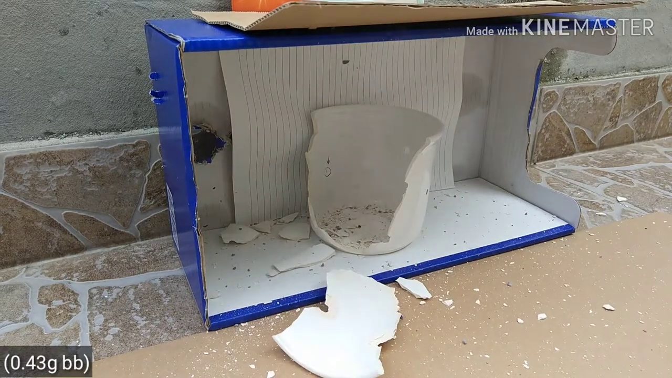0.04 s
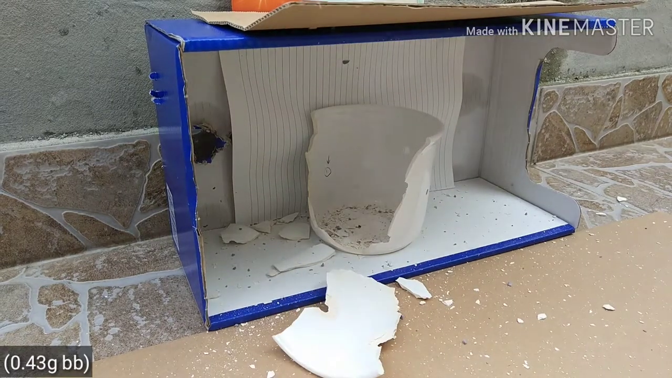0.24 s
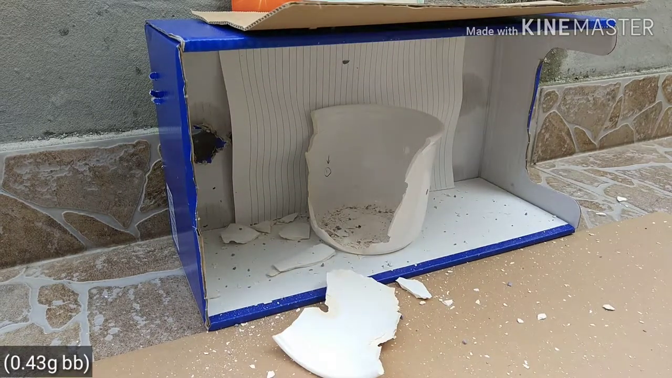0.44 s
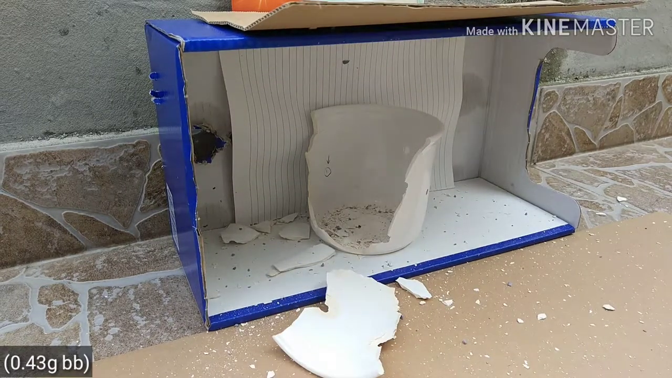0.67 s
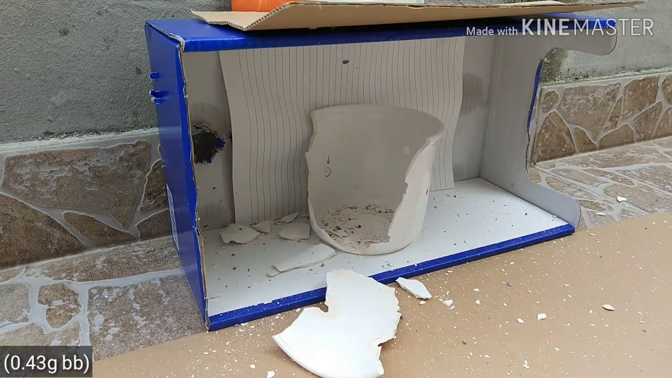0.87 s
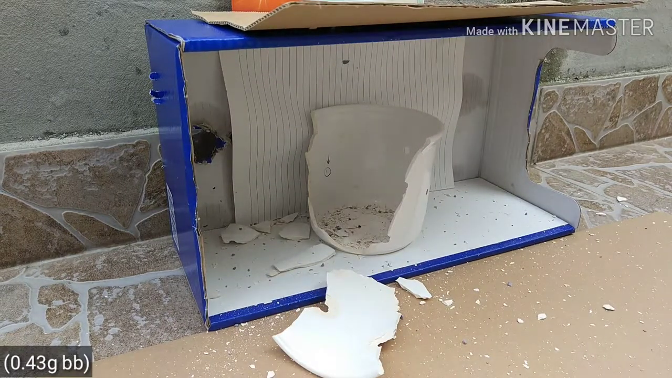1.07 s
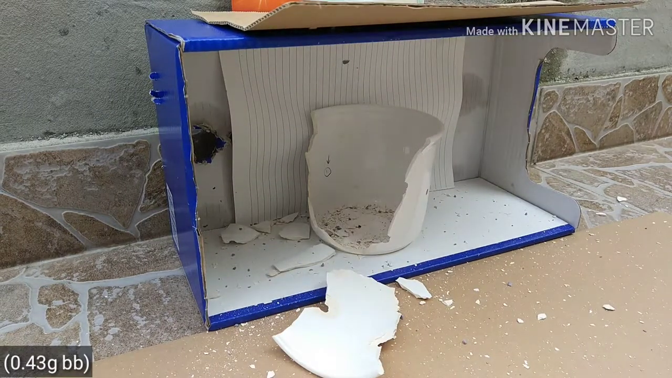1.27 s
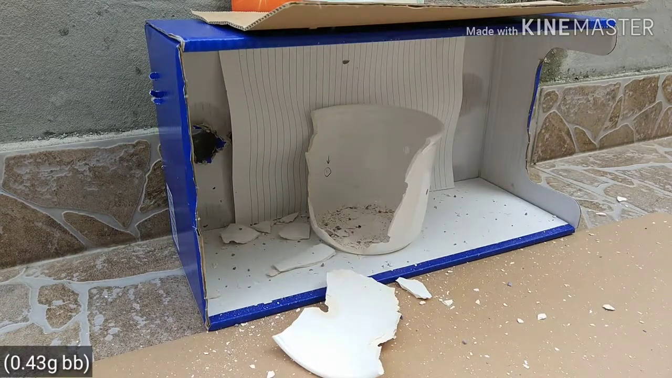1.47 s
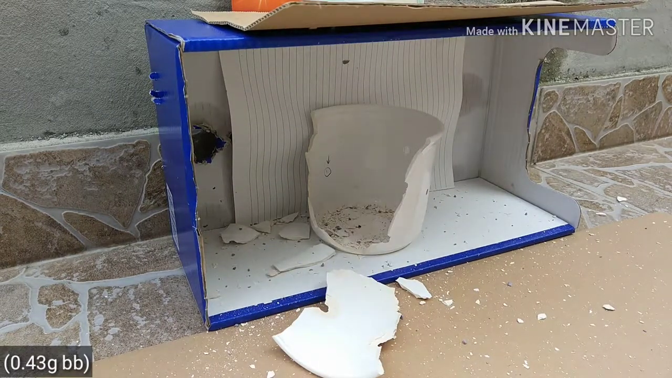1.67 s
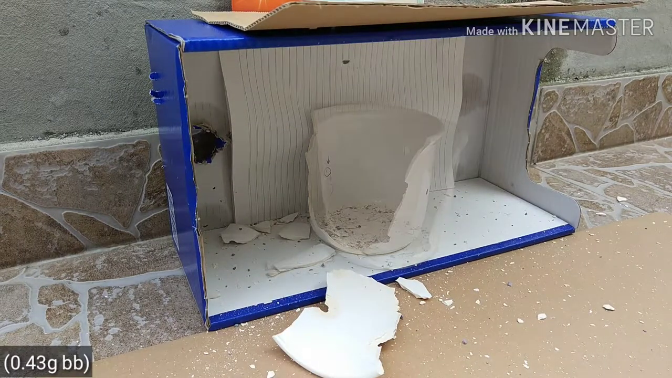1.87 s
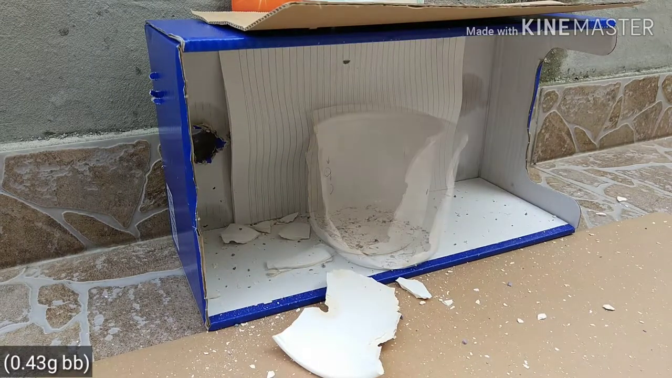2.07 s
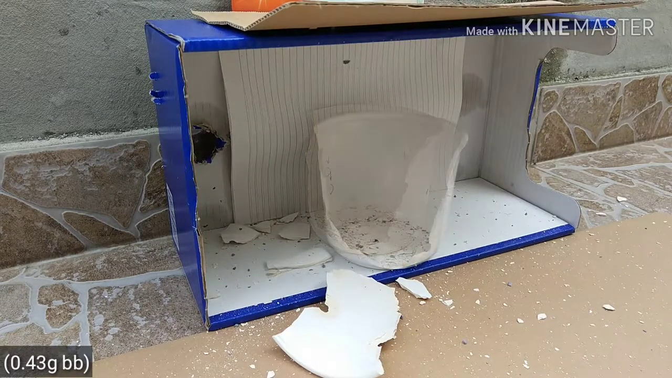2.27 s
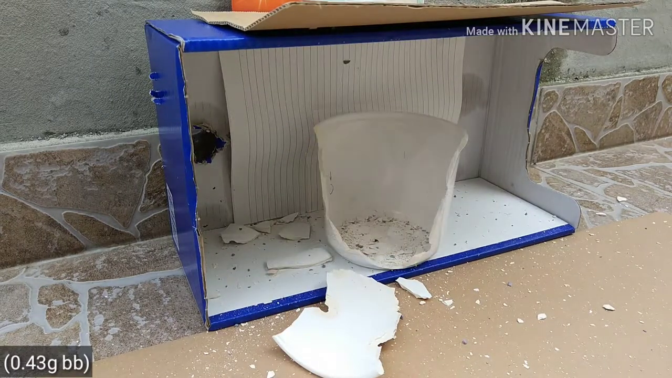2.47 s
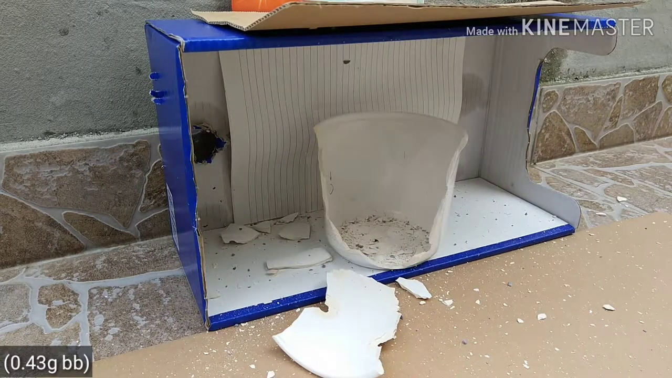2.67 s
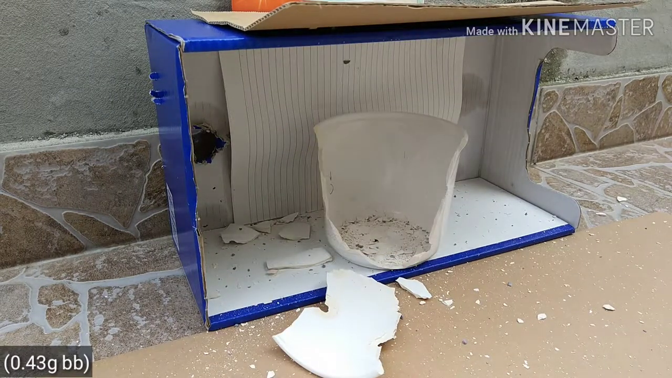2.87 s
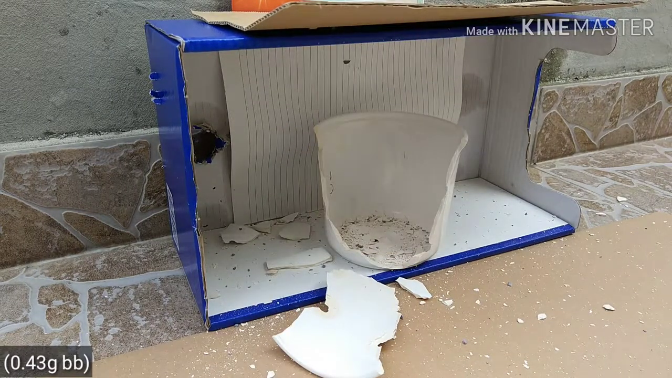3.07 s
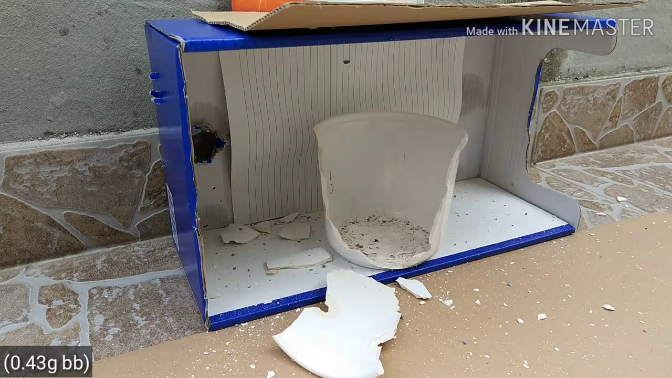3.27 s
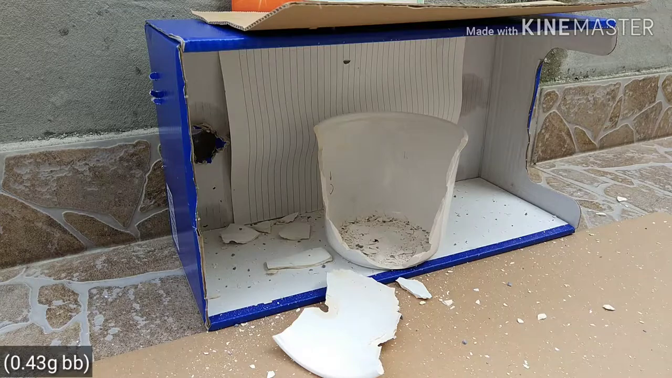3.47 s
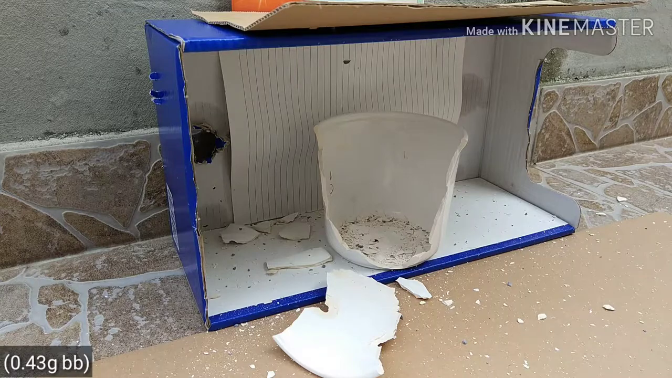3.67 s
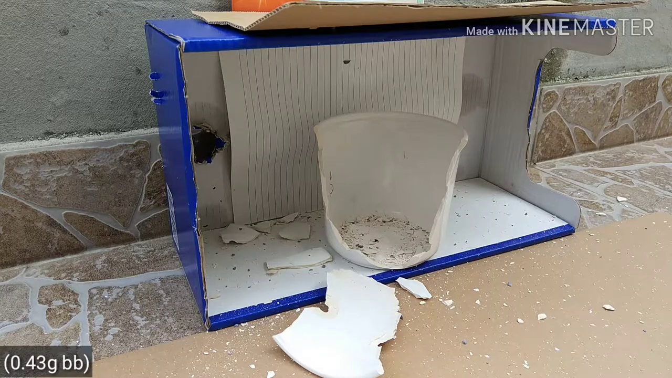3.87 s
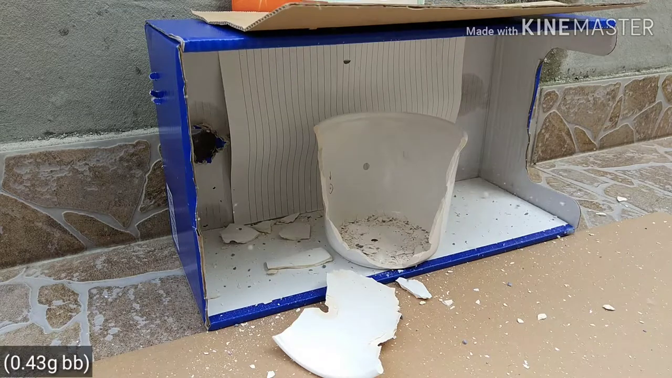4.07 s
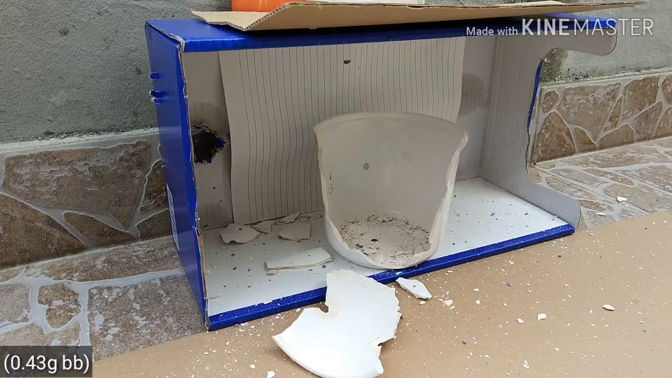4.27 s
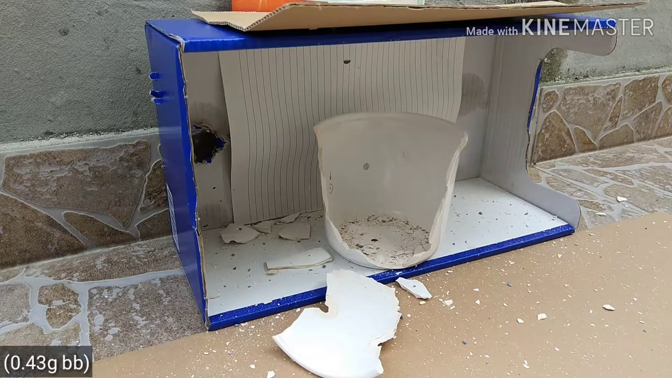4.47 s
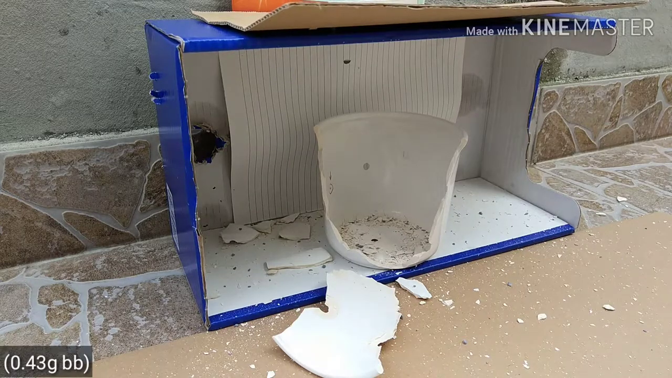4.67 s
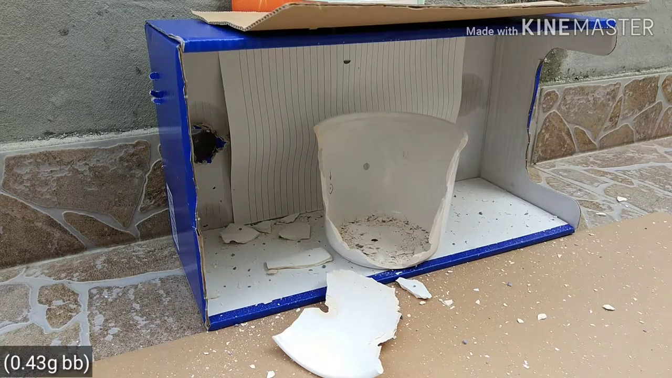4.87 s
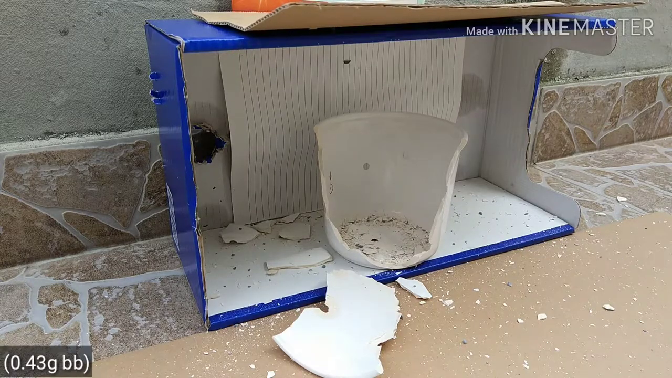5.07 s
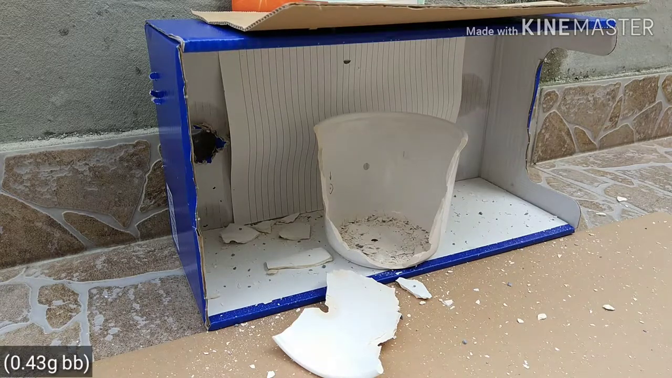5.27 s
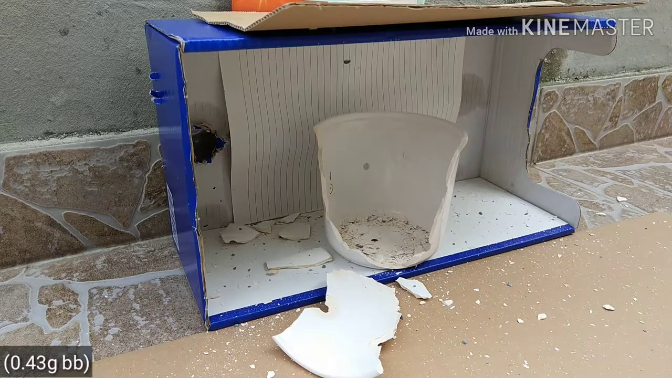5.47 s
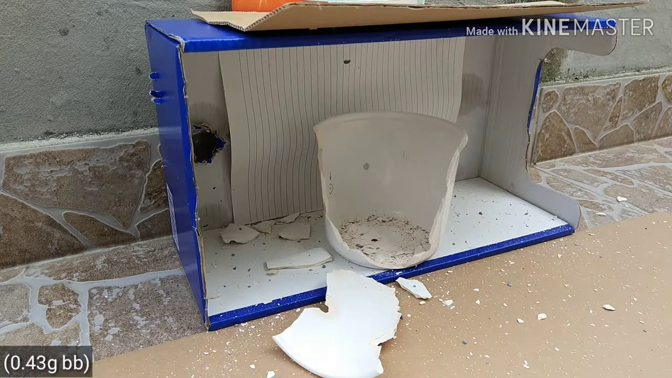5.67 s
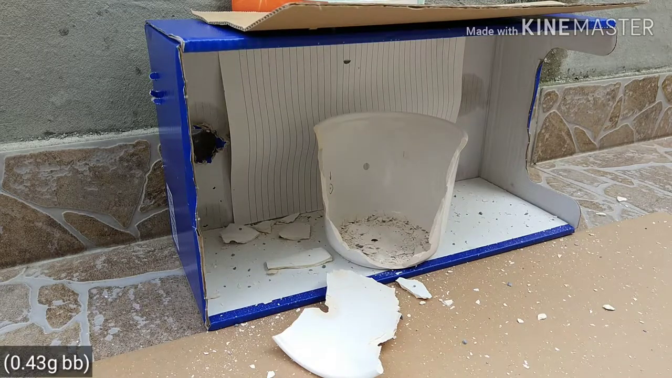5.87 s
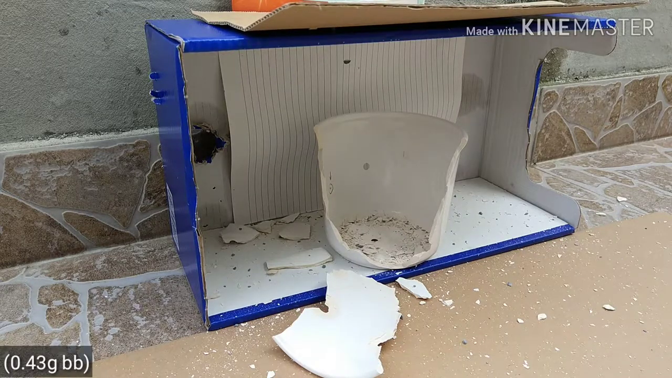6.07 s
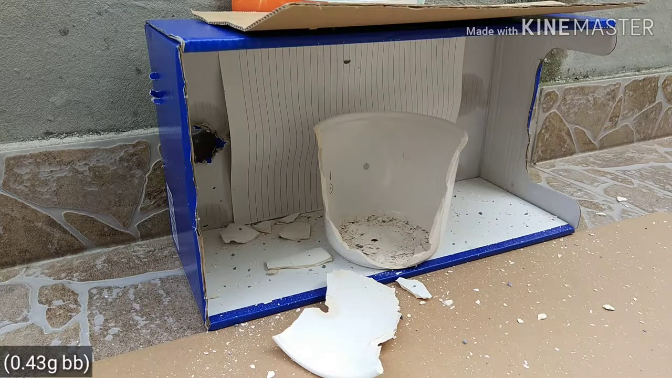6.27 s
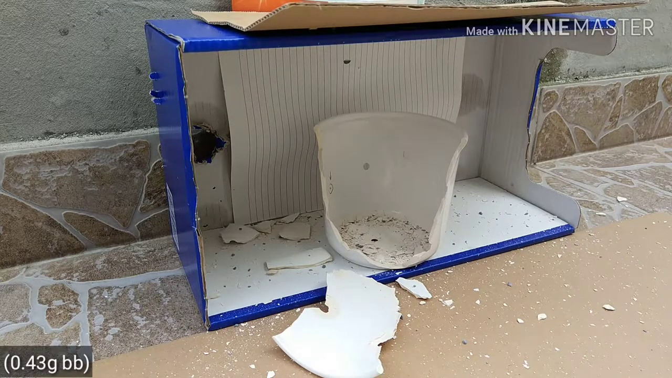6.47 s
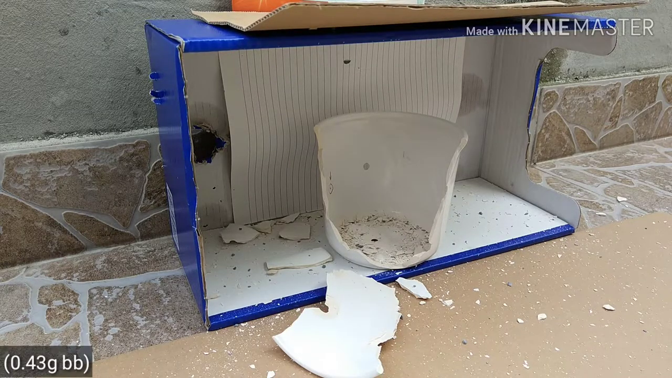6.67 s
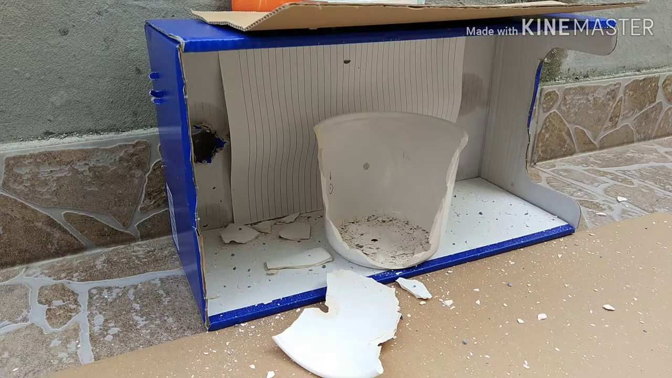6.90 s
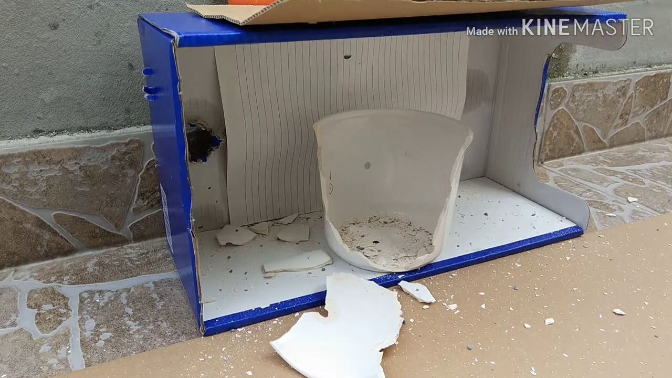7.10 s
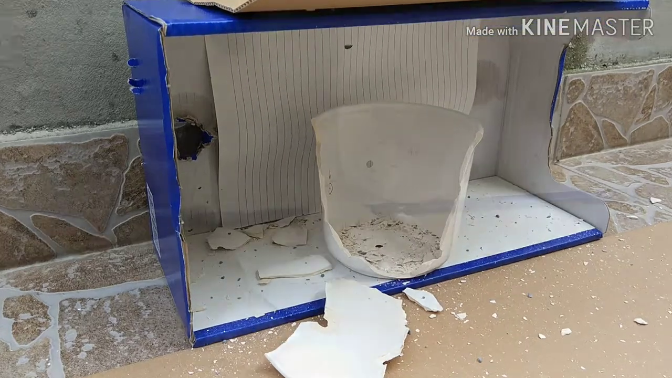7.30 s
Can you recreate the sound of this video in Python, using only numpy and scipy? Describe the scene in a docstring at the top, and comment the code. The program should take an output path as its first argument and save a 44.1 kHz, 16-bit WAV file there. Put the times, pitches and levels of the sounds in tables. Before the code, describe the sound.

A pellet cracks violently into a broken ceramic pot, showering grit and shards, amid sparse sharp chip ticks and faint traffic hum outdoors.

```python
"""Close to a two-microphone camera on a tiled yard: traffic hum, hiss and a thin far tone; chips tick near the left.
A vehicle's drone, summed from wavering engine orders, swells from about 2 s, as more chips tick and grit spills.
At 3.94 s a plastic pellet cracks a broken ceramic pot in an open box: noise bursts, dull resonances and echoes.
Noise and tiny damped tones make the shower of grit and shards that follows, while the left side dips briefly.
Stray ticks, clinks and small spills come after; the drone sinks in pitch around 5.35 s and fades."""
import sys
import numpy as np
from scipy import signal
from scipy.fft import rfft, irfft, next_fast_len
from scipy.io import wavfile
from scipy.ndimage import uniform_filter1d, map_coordinates

SR = 44100
rng = np.random.default_rng(int(sys.argv[2]) if len(sys.argv) > 2 else 0)


def master_out(mix):
    """Clip the mix to full scale and print it as 16-bit PCM to the path in sys.argv[1]."""
    frames = np.transpose(np.atleast_2d(mix))
    ceiling = np.clip(frames, -1, 1)
    pcm = np.round(ceiling * 32767).astype(np.int16)
    wavfile.write(sys.argv[1], SR, pcm)


def gain_from_decibels(decibels):
    """Convert decibel values to linear amplitude factors."""
    exponent = np.asarray(decibels, float) / 20
    return 10 ** exponent


N = 323694
TIME = np.arange(N) / SR  # seconds

# town bed before its wobble: start_s, traffic_level_db, far_hiss_level_db
TOWN_LEVELS = [(0, -64.5, -58.5), (.8, -62.5, -61.5), (2.0, -64, -63.5), (2.3, -64, -67),
               (2.76, -60, -66.5), (3.2, -56.5, -63), (4.6, -57.5, -64), (5.8, -60.5, -63),
               (6.8, -60.5, -64), (7.34, -64.5, -67.5)]
# colour of the traffic rumble, before scaling to rms 1: frequency_hz, density_db
TRAFFIC_SPECTRUM = [(30, -46.5), (60, -36), (100, -20.5), (150, -11.5), (185, -14), (205, -3), (235, -9.5),
                    (270, -7.5), (300, -4.5), (340, -12), (620, -15), (1000, -18.5), (3000, -32.5),
                    (6000, -59.5)]
# how alike the rumble is at the two microphones: frequency_hz, correlation (-1 to 1)
RUMBLE_LIKENESS = [(60, 0.94), (150, 0.79), (380, 0.78), (950, -0.21), (2380, -0.64), (5980, 0.16),
                   (15000, -0.42)]
# colour of the far hiss, before scaling to rms 1: frequency_hz, density_db
HISS_SPECTRUM = [(400, -16), (700, -9), (1500, -14.5), (4000, -19.5), (8000, -19.5), (12000, -12),
                 (15000, -20)]
# passing engine, common to all its orders: start_s, level_db
ENGINE_LEVEL = [(1.8, -94), (2.3, -73), (2.8, -69.5), (3.8, -64), (4.4, -70), (5.4, -69), (6.2, -72),
                (7.34, -81.5)]
# engine orders relative to that level: multiple_of_base_pitch, level_db
ENGINE_ORDERS = [(1, -2), (2, -4.5), (3, 4.5), (4, 0.5)]
# thin tone far off, before its wobble: start_s, level_db
WHINE_LEVEL = [(0, -75.5), (3.8, -80.5), (5, -74.5), (7, -68.5), (7.34, -87)]
# slow level of the fine rustle near the left microphone: start_s, level_db
RUSTLE_LEVEL = [(0, -59.5), (.88, -61.5), (1.06, -55), (1.4, -62), (2.02, -71), (2.5, -90), (4.4, -90),
                (4.6, -57.5), (5.0, -71.5), (5.9, -65), (6.1, -71), (7.34, -73)]
# shower after the shot: start_s, grit_level_db, shards_level_db (shards before the left-right balance)
SHOWER_LEVELS = [(3.95, -90.5, -90), (3.96, -28.5, -38), (4.0, -30, -38), (4.06, -31, -30),
                 (4.12, -28.5, -39), (4.2, -28.5, -43), (4.3, -28.5, -50), (4.4, -34, -53),
                 (4.48, -36.5, -59), (4.58, -56.5, -62.5), (4.7, -72, -74), (5.0, -91, -68.5)]
# short spills: start_s, length_s, grit_level_db, shards_level_db (shards before the left-right balance)
SPILLS_OF_DEBRIS = [(2.108, 0.099, -59.5, -73), (2.222, 0.027, -55, -92), (3.962, .015, -17.5, -28),
                    (4.739, 0.21, -52.5, -65.5), (5.338, .03, -56.5, -90), (5.648, 0.016, -57, -90),
                    (6.45, 0.029, -62, -91.5), (6.85, .02, -60.5, -90)]
# colour of fine grit, before scaling to rms 1: frequency_hz, density_db
GRIT_SPECTRUM = [(500, -39.5), (1500, -22.5), (3000, -11.5), (7500, -15), (10000, -7.5), (12000, 3),
                 (14000, -4.5), (15600, -6)]
# colour of the shards' wash, before scaling to rms 1: frequency_hz, density_db
SHARD_SPECTRUM = [(100, -27.5), (250, 0), (700, -5.5), (2200, -3.5), (4500, -7), (9000, -6.5),
                  (15000, -10.5), (16500, -16)]
# colour of near sounds on reaching the far microphone: frequency_hz, gain_db
FAR_SIDE_GAIN = [(1000, 0.5), (5000, 5), (8000, 3.5), (12000, -6.5), (15000, -5.5)]
# lower clinks of bigger pieces: start_s, pitch_hz, level_db, t60_s
PIECE_CLINKS = [(0.0923, 2920, -41.5, 0.07), (0.095, 2100, -48, 0.084), (0.1635, 820, -52, 0.048),
                (1.1197, 1450, -53, 0.084), (1.1195, 3930, -53, 0.061), (1.121, 5200, -46, 0.075),
                (1.236, 2110, -51, 0.11), (2.217, 6400, -61, .03), (2.249, 3700, -59, .05),
                (4.037, 342, -31, .027), (4.076, 1270, -32, 0.022), (4.16, 4400, -31.5, 0.056),
                (4.1746, 393, -42, .022), (4.2094, 333, -32, 0.021), (4.2356, 1997, -24.5, 0.037),
                (4.2367, 2424, -23, .025), (4.2694, 3980, -37, .022), (4.296, 5350, -35.5, 0.034),
                (4.335, 4030, -40, 0.02), (4.3806, 4900, -43, 0.032), (4.4988, 2890, -32.5, 0.032),
                (4.499, 3400, -35, 0.035), (4.4992, 5570, -25, 0.012), (5.1142, 5490, -41, 0.068),
                (5.1142, 2800, -47.5, 0.039), (5.9765, 3240, -40, 0.027), (5.9776, 5500, -49, 0.052)]
# bright ticks of chips: start_s, left_level_db, right_level_db, skid_t60_s, brightness_db_per_octave
CHIP_TICKS = [(0.0936, -11, -23, 0.024, -6.5), (0.1627, -42, -59, .023, -2), (0.912, -46, -58, .015, 0),
              (1.1187, -15, -55, 0.024, -2), (1.121, -21, -54, 0.015, -3), (1.237, -17.5, -50, 0.035, -4),
              (2.217, -36.5, -64, .017, -1), (2.2495, -32.5, -52, 0.032, -7), (4.076, -25.5, -42, 0.016, 3),
              (4.16, -32, -43, .019, 0), (4.1744, -19, -41, 0.014, 0), (4.212, -20.5, -40, 0.015, 4),
              (4.237, -24.5, -42, 0.014, 0), (4.2571, -22, -42, .015, 0), (4.2703, -14, -42, .012, 3),
              (4.2965, -16.5, -44, 0.026, -2.5), (4.3354, -20, -49, .013, 5), (4.3802, -21, -56, 0.033, 3),
              (4.4123, -24, -56, 0.019, 3), (4.4619, -27, -55, .013, 0), (4.49, -28, -44, 0.0097, 0),
              (4.4993, -10.5, -40, 0.012, 0), (4.555, -41, -68, 0.02, 2), (4.595, -39.5, -58, 0.012, 2),
              (4.647, -36, -61, 0.01, 4), (5.1135, -10.5, -39, .016, 9), (5.133, -25, -44, 0.013, 2.5),
              (5.3386, -39, -54.5, 0.015, 3), (5.9773, -8.5, -39, 0.012, 14), (6.011, -31, -43.5, .014, 3),
              (6.055, -45, -65, 0.016, 3)]
# modes of a small chip, before each tick's tilt and random strengths: pitch_hz, width_hz, level_db
CHIP_MODES = [(6090, 290, -9.5), (6190, 370, -6.5), (8720, 350, -2), (8710, 290, -6), (10740, 700, 2.5),
              (11050, 140, -3), (12090, 340, 7), (12600, 550, -16), (13850, 450, -8.5), (14810, 720, -7.5)]
# pellet cracks, splitting wall and rebounds: start_s, left_level_db, right_level_db, thud_level_db, crack_t60_s
# (thud level before the left-right balance)
PELLET_CRACKS = [(3.9398, -35.5, -31.5, -53.5, 0.023), (3.9412, -4.5, -7, -34, 0.075),
                 (3.9489, -3, -7, -15.5, 0.042), (3.951, -3.5, 0.5, -5.5, 0.029),
                 (3.956, -8, -13, -6.5, 0.018), (3.9589, -2.5, -8, -8.5, 0.033),
                 (3.9638, -5, -12, -14.5, .012), (3.97, -16, -12, -22, 0.026),
                 (3.975, -9, -12.5, -24.5, .02), (3.982, -19.5, -16.5, -24, 0.035)]
# relative modes of pot and box, before the bass cut: pitch_hz, width_hz, level_db
POT_MODES = [(80, 36, -9), (222, 77, 4.5), (598.7, 110, -0.5), (945, 130, -1.5), (1180, 180, -4.5),
             (1480, 180, -2.5)]
# dying time of the yard's echoes: frequency_hz, t60_s
YARD_T60 = [(200, 0.21), (1500, 0.084), (6000, 0.13), (14000, 0.093)]
# dips of the left side after the crack, summed where they overlap, then smoothed: start_s, end_s, level_db
LEFT_DIPS = [(3.9519, 3.9573, -14), (3.971, 3.9763, -5.5), (3.98, 3.995, -13), (3.991, 4.02, -30.5),
             (4.042, 4.075, -32.5), (4.06, 4.13, -5)]
# colour of the right microphone against the left: frequency_hz, gain_db
RIGHT_MICROPHONE = [(100, 1), (1500, 1), (5000, 3), (8000, -0.5), (12000, -5.5), (15000, -1.5)]
# the camera's pass band: frequency_hz, gain_db
PASS_BAND = [(30, -14), (70, -11), (130, -5), (200, 0.5), (250, 0), (15300, -1.5), (15900, -27.5),
             (16300, -63)]


def unit(x):
    """Scales a sound to rms 1."""
    return x / np.sqrt(np.mean(x ** 2) + 1e-20)


def along(points, hz):
    """Reads (frequency_hz, value) points at hz on a logarithmic frequency axis."""
    point_hz, values = np.transpose(points)
    return np.interp(np.log(hz + 1), np.log(point_hz + 1), values)


def curves(rows):
    """Gives one value per sample for each column after the time."""
    seconds, *columns = np.transpose(rows)
    return [np.interp(TIME, seconds, column) for column in columns]


def wobble(rate):
    """Draws a smooth random curve with rate knots a second."""
    knots = rng.standard_normal(int(N * rate / SR) + 4)
    return map_coordinates(knots, [TIME * rate])


def filtered(x, response):
    """Multiplies the spectrum of x by a complex response of frequency."""
    n = x.shape[-1]
    padded = next_fast_len(n + 8192)  # silent room for the filter to ring out
    spectrum = rfft(x, padded) * response(np.fft.rfftfreq(padded, 1 / SR))
    return irfft(spectrum, padded)[..., :n]


def coloured(x, spectrum):
    """Shapes noise to the given spectrum, at rms 1."""
    return unit(filtered(x, lambda hz: gain_from_decibels(along(spectrum, hz))))


def resonances(modes):
    """Sums damped resonators (pitch_hz, width_hz, level_db) of alternating sign into a causal response."""
    def response(f):
        total = 0
        for k, (hz, width, db) in enumerate(modes):
            damping = 1j * f * width
            total = total + (-1) ** k * gain_from_decibels(db) * damping / (hz * hz - f * f + damping)
        return total
    return response


def burst(response, envelope):
    """Makes two short coloured noises, each holding exactly the energy of its envelope."""
    x = filtered(rng.standard_normal((2, len(envelope))), response) * envelope
    return x * np.linalg.norm(envelope) / np.linalg.norm(x, axis=1, keepdims=True)


def add(out, start_s, x):
    """Mixes x into out at start_s."""
    part = out[:, round(start_s * SR):][:, :x.shape[1]]
    part += x[:, :part.shape[1]]


def yard(x, wet_db):
    """Box, wall and tiles answer with noise tails, separate per side; each frequency dies at its own speed."""
    hz, t, z = signal.stft(rng.standard_normal((2, SR // 2)), SR, nperseg=128)
    decay = gain_from_decibels(-60 * t / along(YARD_T60, hz)[:, None])
    tail = signal.istft(z * decay, SR, nperseg=128)[1]
    tail = np.pad(tail / np.linalg.norm(tail[0]), ((0, 0), (60, 0)))  # echoes wait 60 samples
    return gain_from_decibels(wet_db) * signal.fftconvolve(x, tail, axes=1)[:, :x.shape[1]]


def traffic():
    """Distant rumble: mid and side noise are weighted so that left-right likeness varies with frequency."""
    def mid_side(hz):
        turn = np.arccos(np.clip(along(RUMBLE_LIKENESS, hz), -1, 1)) / 2
        return gain_from_decibels(along(TRAFFIC_SPECTRUM, hz)) * [np.cos(turn), np.sin(turn)]
    level_db = curves(TOWN_LEVELS)[0] + 0.58 * wobble(13)
    mid, side = filtered(rng.standard_normal((2, N)), mid_side)
    return gain_from_decibels(level_db) * unit(np.array([mid + side, mid - side]))


def far_hiss():
    """Far hiss: coloured noise unrelated at the two microphones."""
    return gain_from_decibels(curves(TOWN_LEVELS)[1]) * coloured(rng.standard_normal((2, N)), HISS_SPECTRUM)


def passing_engine():
    """A far vehicle drones in unsteady multiples of one base pitch, which sinks as it goes by."""
    cruise_hz, sink_hz, pass_s, pass_width_s = 65.7, 10.5, 5.35, 0.45
    base_hz = cruise_hz - sink_hz * (1 + np.tanh((TIME - pass_s) / pass_width_s)) / 2
    turns = np.cumsum(base_hz * (1 + 0.017 * wobble(7.7))) / SR
    engine_db = curves(ENGINE_LEVEL)[0]
    drone = np.zeros(N)
    for multiple, order_db in ENGINE_ORDERS:
        level_db = engine_db + order_db + 4.1 * wobble(18)
        drone += gain_from_decibels(level_db) * np.sin(2 * np.pi * multiple * turns)
    return drone


def far_whine():
    """A thin tone far off wavers slightly in level and phase."""
    level_db = curves(WHINE_LEVEL)[0] + 3 * wobble(25)
    return gain_from_decibels(level_db) * np.sin(2 * np.pi * 614 * TIME + 0.8 * wobble(5.1))


def grains(spectrum, rate, spread_db, smooth):
    """Grit: noise pulsed by uneven random clicks, rate a second, over a share of smooth noise; rms 1."""
    sizes = gain_from_decibels(spread_db * np.minimum(rng.exponential(size=N), 3))
    clicks = (rng.random(N) < rate / SR) * sizes
    spikes = np.convolve(clicks, np.exp(-TIME[:200] / 0.0012))[:N]  # each fades with a 1.2 ms constant
    return coloured(rng.standard_normal(N) * (smooth + unit(spikes)), spectrum)


def tinkle(count, centre_hz, spread, turns, spread_db):
    """Scatters tiny ceramic knocks, each a damped tone of its own pitch and place; rms 1."""
    when, pitch, size, side = rng.random((count, 4)).T
    hz = np.clip(centre_hz * np.exp(spread * (2 * pitch - 1)), 200, 15000)[:, None]
    t = TIME[:400]
    strength = gain_from_decibels(-spread_db * np.log(size + 0.044))[:, None]
    rings = strength * np.sin(2 * np.pi * hz * t) * np.exp(-hz * t / turns)
    index = (when * (N - len(t))).astype(int)[:, None] + np.arange(len(t))
    pans = [np.sqrt(side), np.sqrt(1 - side)]
    return unit(np.array([np.bincount(index.ravel(), (rings * pan[:, None]).ravel(), N) for pan in pans]))


def flow():
    """Gains of grit and of shards: slow rustle, shower and spills summed."""
    rise_db_per_s, fall_db_per_s = 1499.5, 300.5
    grit, shards = gain_from_decibels(curves(SHOWER_LEVELS))
    grit = grit + gain_from_decibels(curves(RUSTLE_LEVEL)[0])
    for start_s, length_s, grit_db, shards_db in SPILLS_OF_DEBRIS:
        before = np.maximum(start_s - TIME, 0)
        after = np.maximum(TIME - start_s - length_s, 0)
        shape = gain_from_decibels(-rise_db_per_s * before - fall_db_per_s * after)
        grit = grit + gain_from_decibels(grit_db) * shape
        shards = shards + gain_from_decibels(shards_db) * shape
    return grit, shards


def debris():
    """Fine grit pours close to the left microphone, while coarser shards wash and knock in the box."""
    grit_gain, shards_gain = flow()
    near_grit = grains(GRIT_SPECTRUM, rate=600, spread_db=-2.5, smooth=1.1)
    far_grit = grains(GRIT_SPECTRUM, rate=700, spread_db=2.5, smooth=2.5)
    far_grit = filtered(far_grit, lambda hz: gain_from_decibels(along(FAR_SIDE_GAIN, hz) - 16.5))
    grit = grit_gain * gain_from_decibels(1.2 * wobble(27)) * np.array([near_grit, far_grit])
    wash = coloured(rng.standard_normal((2, N)), SHARD_SPECTRUM)
    wash = wash * gain_from_decibels(1.8 * wobble(30) + 1.4 * wobble(90) - 2)
    knocks = tinkle(count=2500, centre_hz=2980, spread=1.1, turns=1.2, spread_db=5.5) * gain_from_decibels(-7.5)
    return grit + shards_gain * gain_from_decibels([[-9], [0.1]]) * (wash + knocks)  # left, right balance


def clinks():
    """Bigger pieces ring with the same three modes, scaled to each piece's pitch."""
    t, out = TIME[:SR // 4], np.zeros((2, N))
    for start_s, hz, db, t60 in PIECE_CLINKS:
        body = resonances([(0.37 * hz, 0.07 * hz, -16), (hz, 0.067 * hz, 0), (2.6 * hz, 0.063 * hz, -9)])
        strike = gain_from_decibels(db) * burst(body, gain_from_decibels(-60 * t / t60) * (1 - np.exp(-t / 0.00036)))
        tone = np.sin(2 * np.pi * (hz * t + rng.random((2, 1))))
        lingering = gain_from_decibels(db - 12.5 - 60 * t / (1.7 * t60)) * tone  # a clear ring outlasts the strike
        clink = strike + lingering
        add(out, start_s, clink + yard(clink, [[-14], [-12]]))
    return out


def chips():
    """Sharp ticks ring a chip's modes at new strengths; the far microphone gets the stronger share of echo."""
    t, out = TIME[:SR // 4], np.zeros((2, N))
    for start_s, left_db, right_db, t60, tilt_db in CHIP_TICKS:
        modes = [(hz, width, db + tilt_db * np.log2(hz / 10000) + rng.normal(0, 2.0))
                 for hz, width, db in CHIP_MODES]
        ring = resonances(modes)

        def at_microphones(hz):
            treble = ring(hz) * hz ** 2 / (hz ** 2 + 5000 ** 2)
            return treble * gain_from_decibels([0 * hz, along(FAR_SIDE_GAIN, hz)])

        spike_and_skid = 1.07 * gain_from_decibels(-60 * t / 0.0038) + gain_from_decibels(-60 * t / t60)
        contact = spike_and_skid * (1 - np.exp(-t / 0.00031))
        tick = burst(at_microphones, contact) * gain_from_decibels([[left_db], [right_db]])
        add(out, start_s, tick + yard(tick, [[-11], [-1.5]]))
    return out


def impact():
    """The pellet's broad cracks, each with a dull push into the resonances of pot and box."""
    def hollow(hz):
        return resonances(POT_MODES)(hz) * hz ** 2 / (hz ** 2 + 110 ** 2)  # a small pot radiates little deep bass

    def bright(hz):
        points = [(300, -14), (1500, -4.5), (3500, 0), (7000, -1.5), (12000, 5.0), (15500, -0.5)]
        return gain_from_decibels(along(points, hz))

    t, out = TIME[:SR // 2], np.zeros((2, N))
    for start_s, left_db, right_db, thud_db, t60 in PELLET_CRACKS:
        crack = burst(bright, gain_from_decibels(-60 * t / t60) * (1 - np.exp(-t / 0.00087)))
        thud = burst(hollow, gain_from_decibels(-60 * t / 0.049) * (1 - np.exp(-t / 0.0029)))
        thud = thud + 0.15 * thud[::-1]  # both microphones share part of the bass
        cracks = gain_from_decibels([[left_db], [right_db]]) * crack
        thuds = gain_from_decibels(thud_db + np.array([[1.5], [-2.5]])) * thud
        direct = cracks + thuds
        add(out, start_s, direct + yard(direct, [[-18], [-6]]))
    return out


def scene():
    """Sums the far town, the near debris and the shot at the two microphones."""
    town = traffic() + far_hiss() + passing_engine() + far_whine()
    return town + debris() + clinks() + chips() + impact()


def low_pass(x):
    """Removes everything above the highest recorded frequency."""
    return signal.sosfilt(signal.butter(12, 16260, fs=SR, output="sos"), x)


def record(dry):
    """The microphones differ in colour, the left one dips, both keep to a pass band and clip at full scale."""
    dip_db = sum(db * ((TIME >= start_s) & (TIME < end_s)) for start_s, end_s, db in LEFT_DIPS)
    dip_db = uniform_filter1d(dip_db * 1.0, size=round(0.0053 * SR))  # edges last 5.3 ms
    left = dry[0] * gain_from_decibels(dip_db)
    right = filtered(dry[1], lambda hz: gain_from_decibels(along(RIGHT_MICROPHONE, hz)))
    passed = filtered(np.array([left, right]), lambda hz: gain_from_decibels(along(PASS_BAND, hz)))
    return low_pass(np.clip(passed, -1, 1))


dry = scene()
out = record(dry)
master_out(out)
```